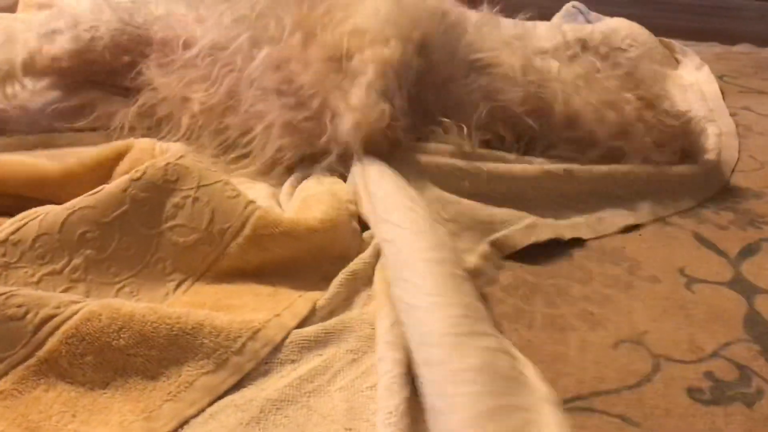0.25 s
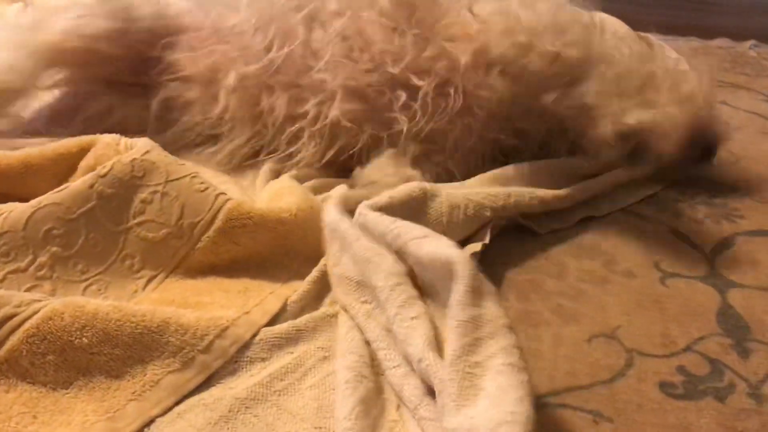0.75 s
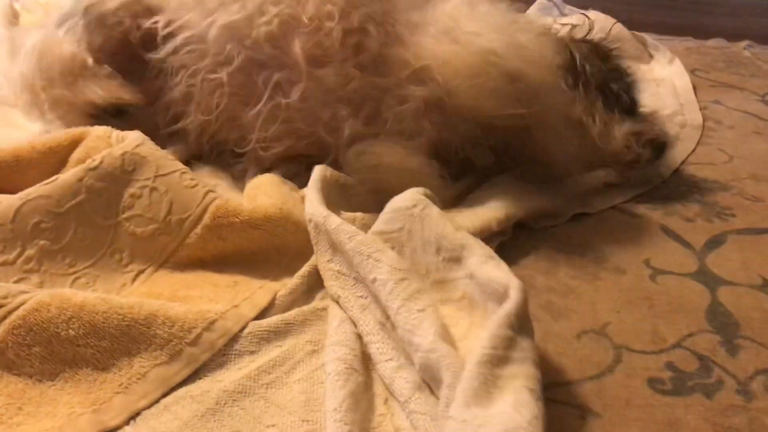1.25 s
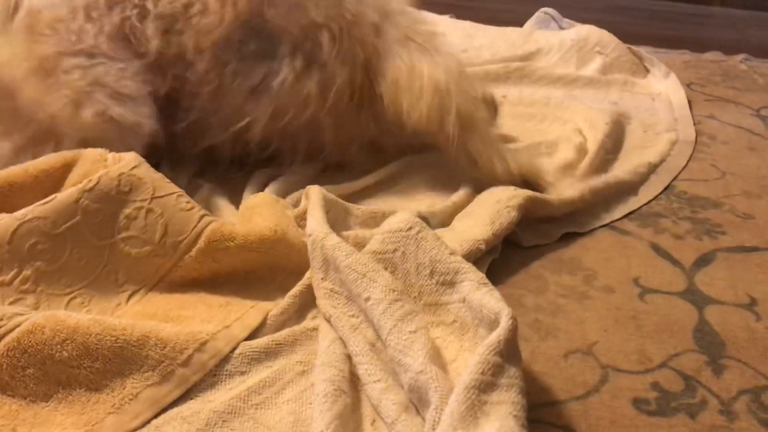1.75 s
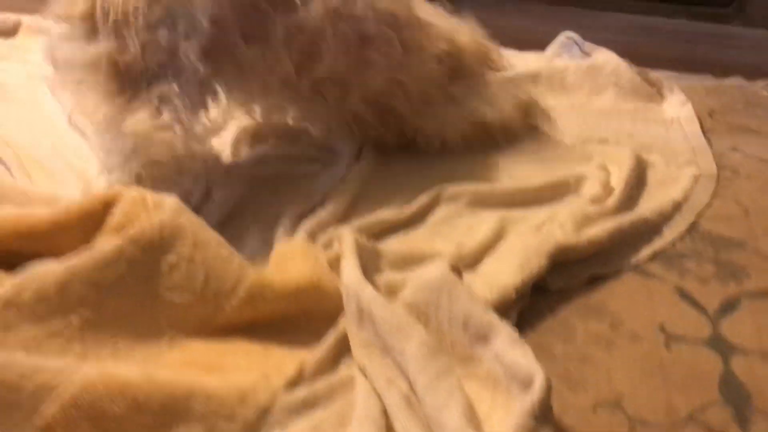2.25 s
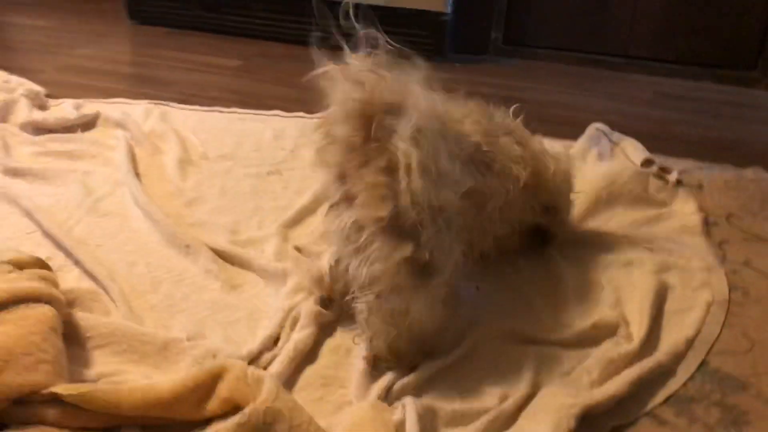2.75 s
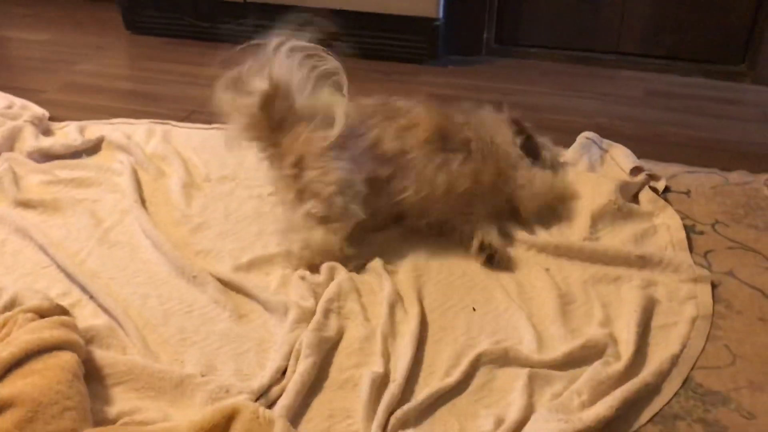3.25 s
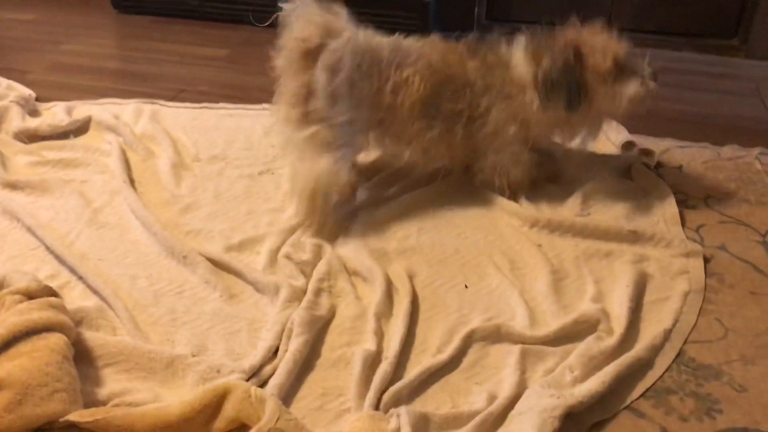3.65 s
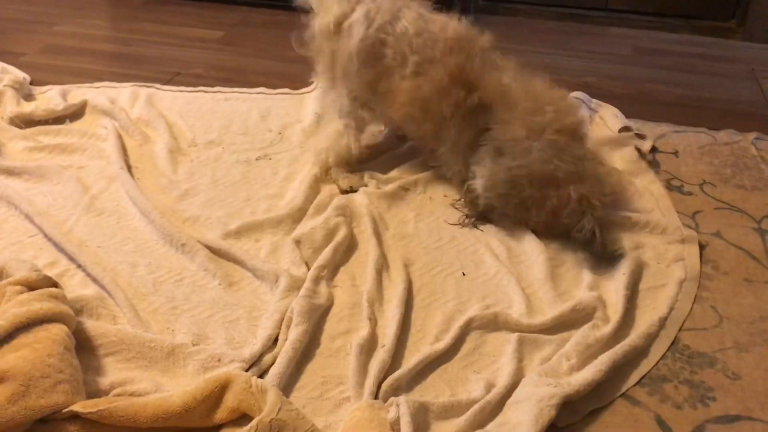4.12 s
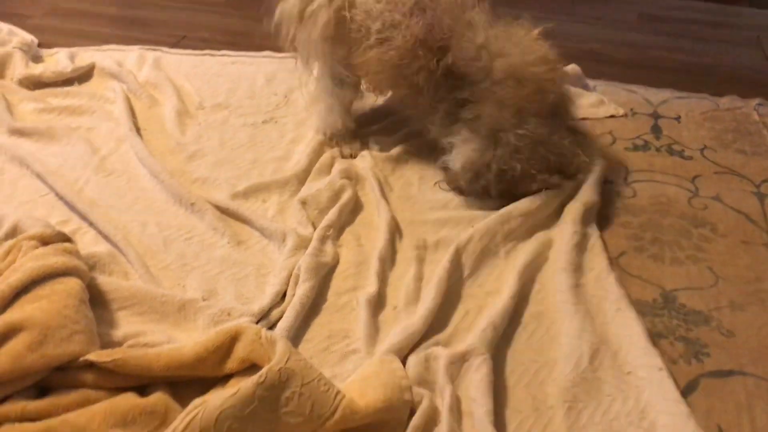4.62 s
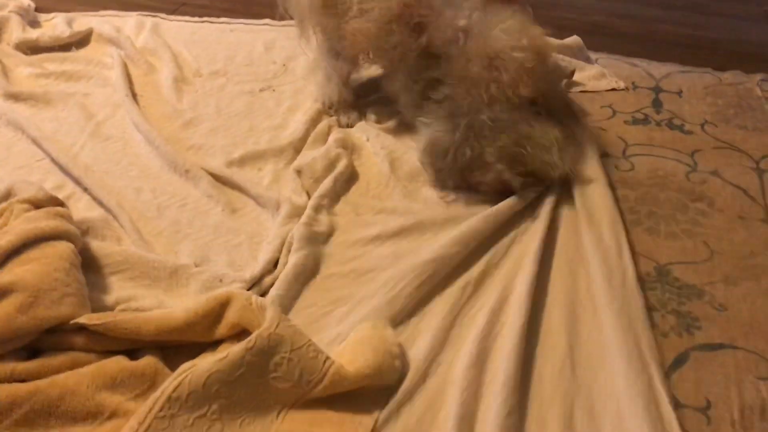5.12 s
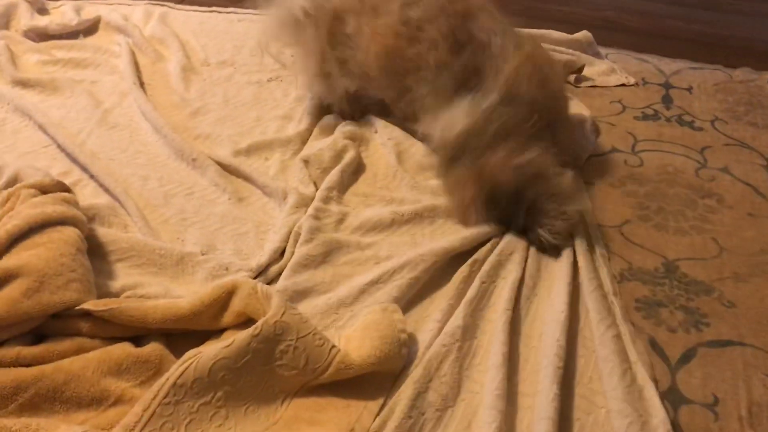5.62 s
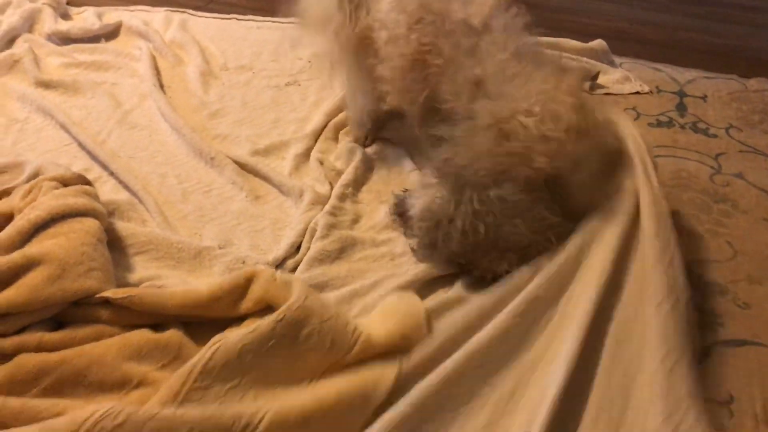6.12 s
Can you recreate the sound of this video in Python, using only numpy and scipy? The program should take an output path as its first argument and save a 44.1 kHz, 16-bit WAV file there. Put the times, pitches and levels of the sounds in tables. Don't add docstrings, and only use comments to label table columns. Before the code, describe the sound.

Close fluttering dog snorts, then bursts of towel scratching, soft paw knocks and fur brushing in a quiet room with a faint appliance hum.

```python
import sys
import numpy as np
from scipy import signal
from scipy.fft import rfft, irfft, next_fast_len
from scipy.io import wavfile
from scipy.ndimage import uniform_filter1d, map_coordinates

SR = 44100
rng = np.random.default_rng(int(sys.argv[2]) if len(sys.argv) > 2 else 0)


def makeup_ratio(level_db):
    decades = np.asarray(level_db, float) / 20
    return 10 ** decades


def generate_wav(signal):
    frames = np.transpose(np.atleast_2d(signal))
    scaled = np.clip(frames, -1, 1) * 32767
    pcm = np.round(scaled).astype(np.int16)
    wavfile.write(sys.argv[1], SR, pcm)


N = 281358
TIME = np.arange(N) / SR


def unit(x):
    return x / np.sqrt(np.mean(x ** 2) + 1e-20)


def along(points, hz):
    f, v = np.transpose(points)
    return np.interp(np.log(hz + 1), np.log(f + 1), v)


def spectrum(points):
    return lambda f: makeup_ratio(along(points, f))


def wobble(rate_hz):
    return map_coordinates(rng.standard_normal(int(N * rate_hz / SR) + 4), [TIME * rate_hz])


def filtered(x, response):
    m = next_fast_len(N + SR // 2)
    return irfft(rfft(x, m) * response(np.fft.rfftfreq(m, 1 / SR)), m)[:N]


def resonances(modes):
    def response(f):
        total = 0
        for k, (hz, width, db) in enumerate(modes):
            peak = 1j * f * width / (hz * hz - f * f + 1j * f * width)
            total = total + (-1) ** k * makeup_ratio(db) * peak
        return total
    return response


def steep(lo_hz, hi_hz):
    return lambda f: 1 / np.sqrt((1 + (lo_hz / (f + 1)) ** 8) * (1 + (f / hi_hz) ** 8))


def both(first, second):
    return lambda f: first(f) * second(f)


def noise(response, patchy_db, grain_db=0):
    grains = rng.standard_normal(N) * makeup_ratio(grain_db * wobble(700))
    z = signal.stft(grains, nperseg=512)[2]
    field = uniform_filter1d(rng.standard_normal(z.shape), size=4, axis=0)
    field = uniform_filter1d(field, size=7, axis=1)
    patchy = signal.istft(z * makeup_ratio(patchy_db * unit(field)), nperseg=512)[1][:N]
    return unit(filtered(patchy, response))


def add(x, s, burst):
    part = x[round(s * SR):][:len(burst)]
    part += burst[:len(part)]


def gesture(s, rise_ms, hold_ms, db, t60, time=TIME):
    rise_power, fall_power, fall_knee_db = 0.81, 1.076, 7.5
    t, rise = time - s, max(rise_ms, 1) / 1000
    fall = 60 * np.clip(t - rise - hold_ms / 1000, 0, None) / t60 / fall_knee_db
    return np.clip(t / rise, 0, 1) ** rise_power * makeup_ratio(db - fall_knee_db * fall ** fall_power)


# (time [s], swell [ms], hold [ms], hiss level [dB], t60 [s])
SNORTS = [
    (0.07, 19.6, 100, -37.5, 0.32),
    (0.097, 10.3, 49.5, -28, 0.1),
    (0.828, 30.7, 67.3, -26, 0.19),
    (1.491, 42.3, 32.7, -28.5, 0.22),
    (3.004, 4.3, 28, -38.5, 0.42),
]
# (time [s], pop peak [dB], pop pitch [Hz], puff of hiss [dB])
FLAPS = [(0.077, -22, 1040, 9), (0.113, -22, 563, 4), (0.125, -26, 670, 6.5), (0.146, -26, 646, 3),
         (0.161, -44, 650, 5), (0.842, -31, 620, -1.5), (0.867, -19.5, 720, 4), (0.879, -12.5, 930, 6),
         (0.895, -19.5, 656, 5.5), (0.907, -8, 780, 3), (0.923, -24, 660, 2), (1.499, -40, 900, 3),
         (1.511, -44, 900, 8.5), (1.523, -31, 1030, 6.5), (1.538, -27, 690, 8), (1.55, -24, 680, 8.5),
         (1.563, -26, 820, 6.5), (3.006, -20.5, 780, 6), (3.017, -29.5, 859, 6)]
# (frequency [Hz], width [Hz], level [dB])
NOSE_TOWARDS = [(700, 650, -5.5), (2820, 405, 2.5), (4650, 400, -3.5), (5500, 330, -3.5), (7170, 390, -1.5),
                (9550, 1200, -8), (13300, 3400, -16)]
# (frequency [Hz], width [Hz], level [dB])
NOSE_AWAY = [(780, 580, -2), (3680, 1150, -2), (6660, 690, -3.5), (8800, 790, -4), (12900, 4700, -15.5)]


def snorts():
    full_db = -27
    hollow_db, hollow_db_per_db, hollow_swell_share = -30, 0.46, 0.52
    push_db, push_db_per_db, push_free_muzzle_db, push_t60_s = -30.5, 0.7, 4, 0.14
    hiss_gain, hollow_gain, push_gain = np.zeros(N), np.zeros(N), np.zeros(N)
    for k, (s, swell_ms, hold_ms, db, t60) in enumerate(SNORTS):
        effort_db = db - full_db
        hiss_gain += gesture(s, swell_ms, hold_ms, db, t60)
        hollow_ms = hollow_swell_share * swell_ms
        hollow_hold_ms = swell_ms - hollow_ms + hold_ms
        hollow_gain += gesture(s, hollow_ms, hollow_hold_ms, hollow_db + hollow_db_per_db * effort_db, t60)
        if k > 0:
            free_db = push_free_muzzle_db * (.6 < s < 1.2 or s > 2.5)
            peak_db = push_db + push_db_per_db * effort_db + free_db
            push_gain += gesture(s, swell_ms + hold_ms, 0, peak_db, push_t60_s)
    hollow_gain = np.roll(hollow_gain, round(0.0049 * SR))

    pops, shove, gate_db = np.zeros(N), np.zeros(N), np.zeros(N)
    t = TIME[:SR // 25]
    thump = (np.sin(2 * np.pi * 78 * t) + 0.5 * np.sin(2 * np.pi * 155 * t)) * np.exp(-t / 0.085)
    for s, pop_db, hz, puff_db in FLAPS:
        age = 3 * t * hz / 2.68
        swell = age * np.exp(1 - age)
        add(pops, s + 0.00125, -makeup_ratio(pop_db + 1.5) * swell ** 3.4 * np.sin(2 * np.pi * hz * t))
        add(shove, s, thump)
        gate_db += puff_db * np.exp(-((TIME - s - 0.0011) / .0045) ** 2)

    away = (TIME > .6) & (TIME < 1.2)
    hiss_band = steep(1700, 17000)
    hiss_away = noise(both(resonances(NOSE_AWAY), hiss_band), 3.9, 0.74)
    hiss_towards = noise(both(resonances(NOSE_TOWARDS), hiss_band), 1.17, 0.76)
    hiss = np.where(away, hiss_away, hiss_towards)
    edge = filtered(hiss, steep(2900, 15000))
    hiss = hiss - edge * (1 - np.clip(hiss_gain / makeup_ratio(-20.0), 0, 1) ** 0.21)
    hollow = noise(both(resonances(NOSE_AWAY[:1]), steep(330, 1600)), 3.2)
    push = 0.6 * filtered(shove, steep(91, 400)) + 0.46 * noise(steep(82, 219), 0.36)
    hiss_part = makeup_ratio(gate_db - 5) * hiss_gain * hiss
    hollow_part = makeup_ratio(0.28 * gate_db - 7.5) * hollow_gain * hollow
    return hiss_part + hollow_part + pops + push_gain * push


# (time [s], rise [ms], peak [dB], t60 [s], folds re peak [dB])
SCRATCHES = [(.43, 12, -51.5, 0.23, -13), (0.486, 3.7, -54, 0.32, 0), (.525, 5, -51, 0.4, -1),
             (0.759, 27, -50.5, 0.6, -3.5), (1.645, 14, -51, 1.5, 1.5), (1.755, 30, -46, 0.73, -9),
             (2.47, 18, -52, 0.46, -1), (2.555, 11, -50.5, 0.41, -0.5), (2.63, 4, -47, 0.67, 2),
             (2.777, 20, -40.5, 0.43, -2), (2.918, 13, -56.5, 0.3, -1), (2.94, 66, -49.5, 0.35, -1.5),
             (3.598, 4, -55.5, 0.22, -16), (3.646, 10, -40, .2, 0), (3.687, 32, -36.5, 0.48, -3.5),
             (4.468, 16, -39.5, 0.54, -1), (4.548, 6.5, -44, 0.27, -2), (4.648, 5, -45.5, 0.66, -10),
             (4.674, 20, -43, .3, -3), (4.78, 17, -50.5, 0.42, -7), (5.44, 61, -48, 0.49, -5.5),
             (5.646, 8, -42.5, 0.39, -4), (5.877, 3.1, -58, .2, -2), (6.23, 24, -55, 2, 0)]
# (time [s], rise [ms], peak [dB], t60 [s], drag re peak [dB])
SHOVES = [(.33, 16, -57, 0.12, -18), (.39, 20, -61, 0.44, -2), (.487, 4, -51, 0.51, 5.5),
          (1.0, 4.5, -55.5, .3, 4.5), (1.77, 12, -57.5, .4, 5.5), (2.06, 22, -51.5, 0.14, -1.5),
          (2.335, 9.3, -54, 0.46, -1), (2.776, 3, -42.5, 0.26, -26), (3.252, 3.4, -66, 0.22, 11),
          (4.188, 13, -49, 0.41, 1.5), (4.44, 26, -35.5, .3, -13.5), (4.774, 26, -40.5, 0.35, -3),
          (4.979, 4, -54, 0.28, 0), (5.13, 52, -56.5, 0.78, -2), (5.45, 62, -57.5, 1.5, -0.5),
          (5.89, 15, -57.5, 0.65, -1), (6.24, 9.5, -58, 3.5, 3)]
# (time [s], rise [ms], peak [dB], t60 [s], nap above 6 kHz re peak [dB])
SWISHES = [(.28, 44, -62.5, 0.19, 12), (.39, 14, -58.5, 0.76, -9), (1.69, 10, -50, 0.34, -9),
           (1.75, 4, -40.5, 0.47, -6.5), (1.88, 37, -63, 0.29, 7), (2.325, 20, -54.5, 0.62, 4.5),
           (2.555, 10, -55, 0.16, 0), (2.632, 6.5, -45, 0.21, -19), (2.727, 4.5, -42, 0.41, -7),
           (2.916, 5.4, -48.5, 0.78, -2), (2.97, 42, -49.5, 0.28, 4), (3.31, 5.6, -63, 0.67, -4),
           (3.67, 48, -36, 0.35, -0.5), (4.19, 23, -56, 0.27, -9), (4.464, 26, -46, .35, -16),
           (4.547, 4.8, -43, 0.21, -5.5), (4.648, 3.6, -51, 0.13, -2), (4.785, 15, -54.5, 0.32, -10),
           (4.97, 3.6, -62, 0.42, 1), (5.12, 35, -58, 0.75, 1.5), (5.27, 48, -56.5, 0.078, 6),
           (5.88, 77, -58.5, 0.87, 0), (6.228, 19, -48, 0.93, -7.5), (6.36, 4.6, -53, 1.5, 9.5)]
# (time [s], rustle level [dB])
RESTLESS = [(0, -63), (.3, -63), (.66, -60), (.8, -64), (1.08, -70.5), (1.33, -67.5), (1.46, -66),
            (2.15, -65.5), (2.3, -63), (2.45, -66), (3.2, -74.5), (3.6, -66), (4.04, -76), (4.35, -69.5),
            (5.1, -70.5), (5.4, -88), (6.1, -61), (6.38, -82)]
RUSTLE_DB = [-3.5, -0.5, -5, 1, 1]
# (frequency [Hz], width [Hz], level [dB])
WEAVE = [(1900, 500, -8), (2450, 270, 0), (3200, 800, -10)]
# (frequency [Hz], width [Hz], level [dB])
FOLDS = [(944, 197, 0.5), (1550, 680, 0)]
# (frequency [Hz], density [dB per Hz])
DRAG = [(150, -19), (260, 1), (500, -1.5), (750, 2.5), (1100, -33.5)]
# (frequency [Hz], density [dB per Hz])
FIZZ = [(1940, -14), (3300, -5.5), (3550, -3), (4580, -4), (4950, -6), (9730, -8.5), (10600, -14.5),
        (12500, -12), (15800, -23)]


def cloth():
    scratch_drag_db, scratch_fizz_db, scratch_nap_db = -13, -6, -13
    swish_hold_per_t60 = 0.056
    coarse = TIME[::20]

    def power_of(s, rise_ms, db, t60, shares_db, hold=0):
        gain = gesture(s, rise_ms, 1000 * hold * t60, db, t60, coarse)
        return np.outer(makeup_ratio(shares_db), gain) ** 2

    restless_db = np.interp(coarse, *np.transpose(RESTLESS))
    power = makeup_ratio(np.add.outer(RUSTLE_DB, restless_db)) ** 2
    for *stroke, folds_db in SCRATCHES:
        power += power_of(*stroke, [0, folds_db, scratch_drag_db, scratch_fizz_db, scratch_nap_db])
    for *stroke, drag_db in SHOVES:
        power[1:3] += power_of(*stroke, [0, drag_db])
    for *stroke, nap_db in SWISHES:
        power[3:] += power_of(*stroke, [0, nap_db], swish_hold_per_t60)
    gains = [np.interp(TIME, coarse, gain) for gain in np.sqrt(power)]
    scrape_gain, folds_gain, drag_gain, fizz_gain, nap_gain = gains

    scrape = noise(both(resonances(WEAVE), steep(1500, 4100)), 2.3, 0.79)
    folds = noise(both(resonances(FOLDS), steep(620, 2200)), 2.13, 1.05)
    drag = noise(spectrum(DRAG), 2.9, 1.7)
    fizz = noise(spectrum(FIZZ), 1.7, 1.13)
    nap = filtered(fizz, lambda f: 1 / (1 + (6000 / (f + 1)) ** 5))
    catch = makeup_ratio(1.45 * wobble(45))
    slack = makeup_ratio(1.2 * wobble(60))
    taut = scrape_gain * scrape + fizz_gain * (fizz - nap) + nap_gain * nap
    loose = folds_gain * folds + drag_gain * drag
    return catch * taut + slack * loose


# (time [s], peak [dB], pitch [Hz], thud re peak [dB])
KNOCKS = [(0.343, -38.5, 1550, -8), (0.395, -34, 326.6, -22), (0.414, -37.5, 316, -8),
          (0.471, -33.5, 393, -16), (0.49, -37, 477, -7), (1.79, -29, 333, -28), (2.09, -51, 221, -1),
          (2.354, -37, 400, -16), (2.513, -37, 258, -18), (3.253, -37, 580, -14), (4.193, -40, 283, -12),
          (4.807, -21.5, 950, -34), (4.983, -36, 483, -13), (5.004, -46, 324, -7), (5.919, -48, 320, -14),
          (6.324, -30.5, 965, -9), (3.67, -35, 204, -13)]
# (time [s], peak [dB], dull part re peak [dB])
CLICKS = [(0.4895, -48.5, 17.5), (0.529, -46, 8.5), (1.0147, -37, -7), (1.0847, -44, -22),
          (2.6336, -47, -6), (4.9843, -34, -16), (5.1173, -52, 3), (5.3366, -38.5, -11), (1.003, -50, -8),
          (4.845, -54, 6), (5.095, -62, 2)]


def paws():
    body, bright, dull = np.zeros(N), np.zeros(N), np.zeros(N)
    t = TIME[:SR // 20]
    for s, db, hz, thud_db in KNOCKS:
        add(body, s, makeup_ratio(db - 60 * t * hz / 9) * np.sin(2 * np.pi * hz * t))
        add(body, s, makeup_ratio(db + thud_db - 0.5 - 60 * t / 0.089) * np.sin(2 * np.pi * 95 * t))
    for s, db, dull_db in CLICKS:
        snag = np.sign(rng.standard_normal(len(t))) * makeup_ratio(db - 60 * t / 0.0072)
        add(bright, s, makeup_ratio(2.5) * snag)
        add(dull, s, makeup_ratio(dull_db + 8) * snag)
    return body + filtered(bright, steep(3200, 7200)) + filtered(dull, steep(700, 2600))


# (frequency [Hz], t60 [s])
WALLS = [(150, 0.074), (1000, 0.3), (5000, 0.25), (14000, 0.24)]


def walls(x):
    hz, t, z = signal.stft(rng.standard_normal(SR // 2), SR, nperseg=256)
    decay = makeup_ratio(-60 * t / along(WALLS, hz)[:, None])
    tail = signal.istft(z * decay, SR, nperseg=256)[1]
    delayed = np.pad(x, (300, 0))
    return signal.fftconvolve(delayed, tail / np.linalg.norm(tail))[:N]


# (frequency [Hz], level [dB rms])
HUM = [(119.8, -48), (239.6, -67), (359.4, -69.5)]
# (frequency [Hz], density [dB per Hz])
AIR = [(18, -63), (30, -7), (42, 2), (55, -5), (90, -3.5), (170, -7), (241, -10), (307, -14.5),
       (500, -17.5), (3580, -33), (4950, -39.5), (6140, -32), (10500, -45), (15800, -40.5)]


def room_tone():
    air_db = -54.5
    base_hz = HUM[0][0]
    cycles = base_hz * TIME + np.cumsum(0.6 * wobble(4.1)) / SR
    hum = np.zeros(N)
    for hz, db in HUM:
        hum += makeup_ratio(db + 1.5 + 1.5 * wobble(5.1)) * np.sin(2 * np.pi * hz / base_hz * cycles)
    air = noise(spectrum(AIR), 1.7)
    return hum + makeup_ratio(air_db + 0.74 * wobble(2.03)) * air


def scene():
    nose, feet = snorts(), paws()
    room = walls(makeup_ratio(-15.5) * nose + makeup_ratio(-8.5) * feet)
    return (nose + feet + room + cloth() + room_tone())[None]


def top_cut(x):
    return signal.sosfilt(signal.butter(12, 16770, fs=SR, output="sos"), x)


def record(dry):
    top_hz = 15830
    mix = filtered(dry[0], lambda hz: hz < top_hz)[None]
    return top_cut(mix)


dry = scene()
out = record(dry)
generate_wav(out)
```